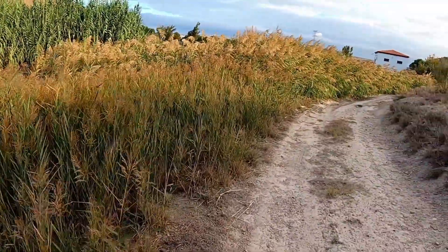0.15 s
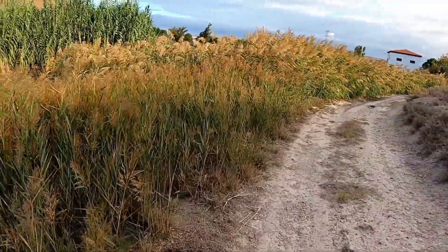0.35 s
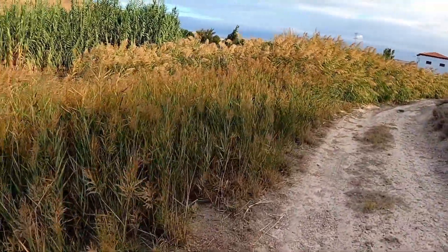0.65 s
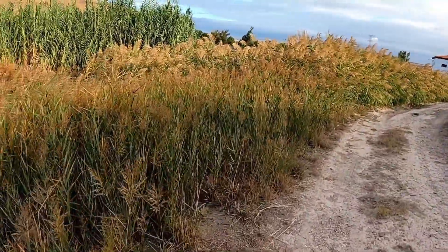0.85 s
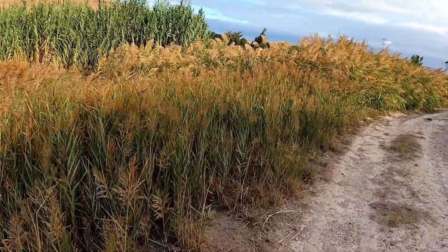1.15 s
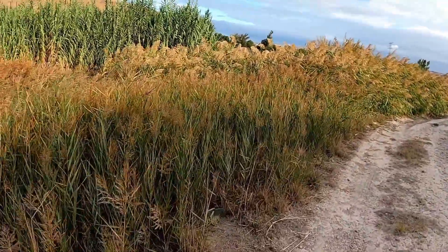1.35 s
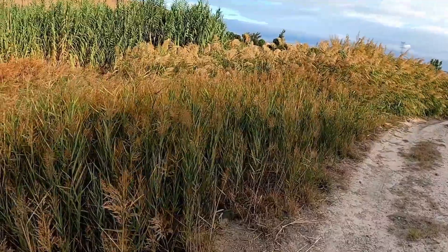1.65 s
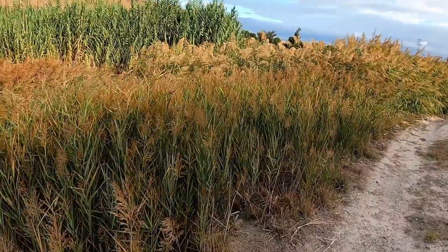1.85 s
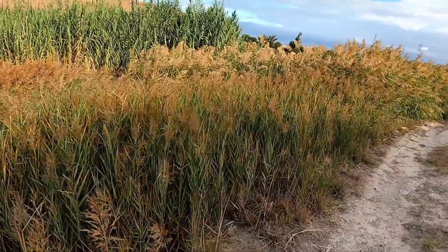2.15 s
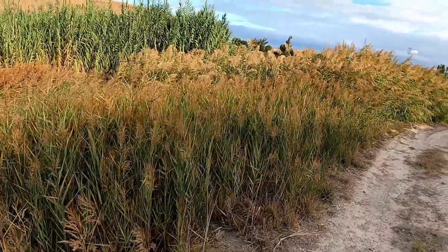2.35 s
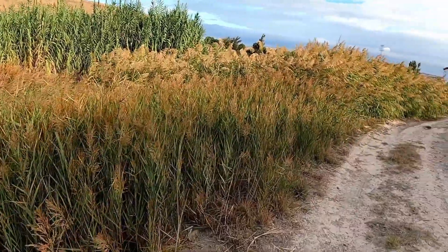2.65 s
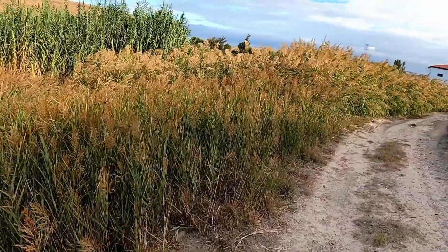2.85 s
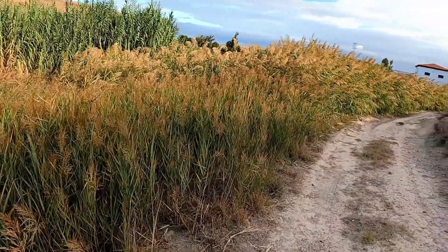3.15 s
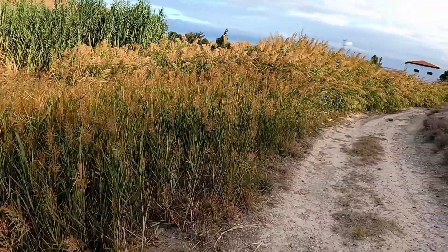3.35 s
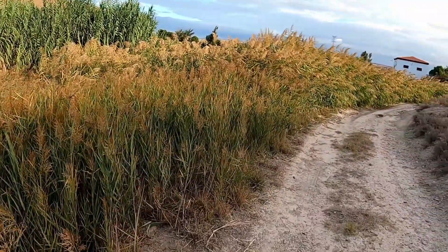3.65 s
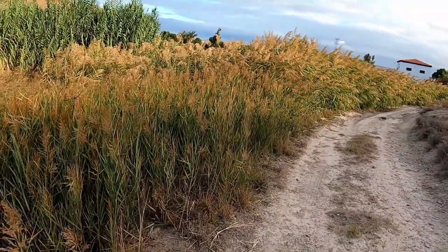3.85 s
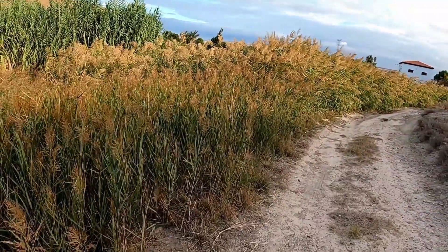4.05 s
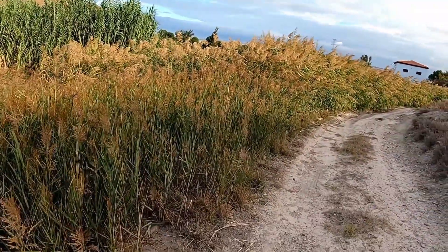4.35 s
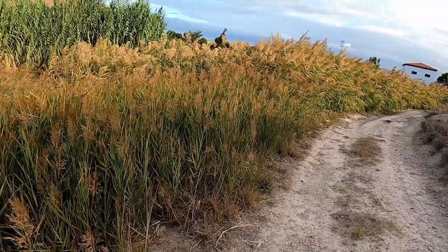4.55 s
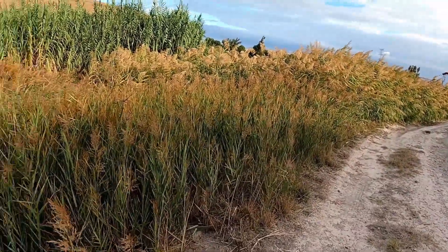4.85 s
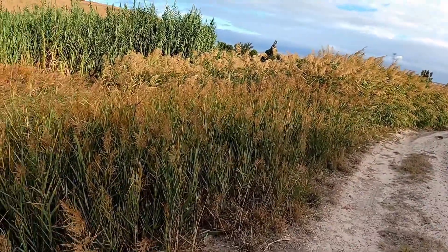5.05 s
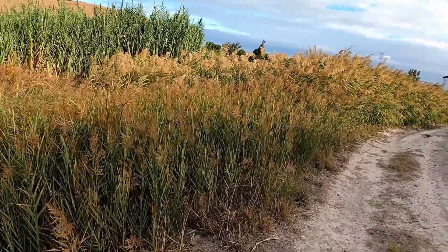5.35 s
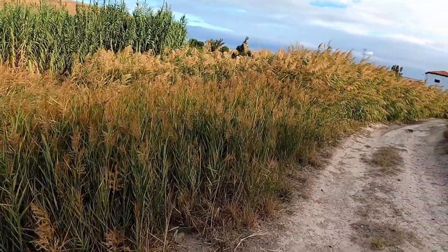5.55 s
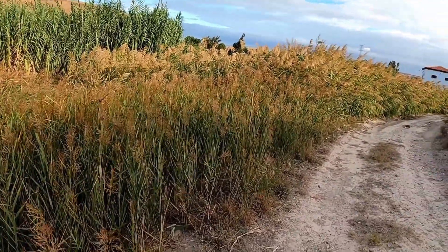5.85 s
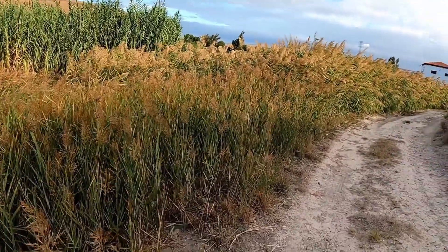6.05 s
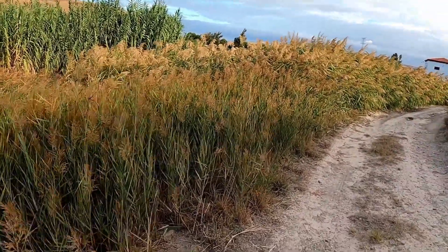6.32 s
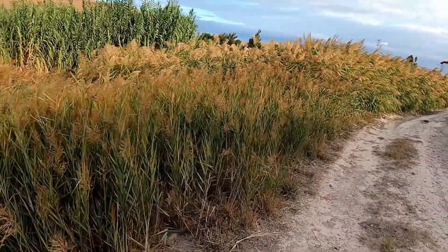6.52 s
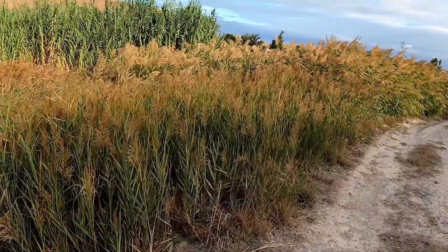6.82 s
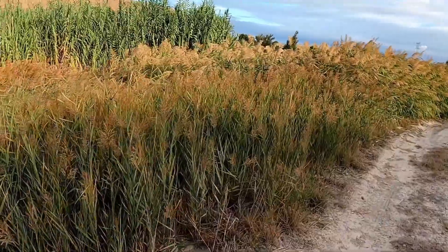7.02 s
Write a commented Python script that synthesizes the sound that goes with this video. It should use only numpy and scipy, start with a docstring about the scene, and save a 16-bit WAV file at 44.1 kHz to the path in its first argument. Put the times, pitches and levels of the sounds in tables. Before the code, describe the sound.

A quiet, airy hiss of reeds runs throughout the seven seconds beside an open farm track. At 0.2 s a puppy a little way off gives a tiny yip, jumping from a rough, chesty note to a thin whistle. A strong, deep wind buffet hits the microphone near 1.1 s, with a shorter one at 1.5 s. Two brief yips, one whistled and one lower, come at 1.9 and 2.0 s; dry stems tick at 2.3 and 2.8 s. From 3.4 s yips repeat quickly, at 3.7, 4.0, 4.4, 4.6 and 4.9 s, hoarse and cracking or thin and whiny, while low gusts thump between 3.0 and 4.0 s. The wind then eases. Another rough yip sounds at 5.4 s, then a cluster at 6.2 to 6.4 s and short squeaks at 6.6 and 6.9 s. Close, quick echoes follow each cry, and occasional faint stem ticks continue.

```python
"""Wind rumbles on the microphone ports and reeds hiss; then puppies yip a little way off along a track.
Most yips start in a chesty register and break upward into a thin whistle; some are whistle alone.
Voices are sums of partials on gliding pitches, roughened by half-rate lines and flutter.
Two clear echoes and a sparse noise scatter give each yip a short tail.
Gusts and reeds are banded noise on level curves; dry stems tick as short noise bursts."""
import sys
import numpy as np
from scipy import signal
from scipy.io import wavfile

SR = 44100
rng = np.random.default_rng(int(sys.argv[2]) if len(sys.argv) > 2 else 0)


def magnitude_from_level(level_db):
    """Linear magnitude for a level in decibels (20 dB per decade)."""
    exponent = np.asarray(level_db, float) / 20
    return 10 ** exponent


def pcm_store(signal):
    """Save signal as 16-bit PCM."""
    levels = np.round(np.clip(np.atleast_2d(signal), -1, 1) * 32767)
    wavfile.write(sys.argv[1], SR, levels.astype(np.int16).T)


N = 316638  # samples


def rms_one(x):
    """Scale to unit power."""
    return x / np.sqrt(np.mean(x ** 2) + 1e-20)


def in_time(rows):
    """Interpolate (t/s, value) rows at every sample."""
    t_s, value = np.transpose(rows)
    return np.interp(np.arange(N) / SR, t_s, value)


def band(x, low_hz, high_hz):
    """Second-order Butterworth band-pass."""
    return signal.sosfilt(signal.butter(2, [low_hz, high_hz], "band", fs=SR, output="sos"), x)


def drift(rate_hz):
    """Slow random curve of unit rms: noise through two equal poles at rate_hz."""
    hop, settling = 40, 2000  # samples at SR, discarded slow samples
    r = np.exp(-2 * np.pi * rate_hz * hop / SR)
    noise = rng.standard_normal(N // hop + settling + 2)
    slow = signal.lfilter([1], [1, -2 * r, r * r], noise)[settling:]
    return np.interp(np.arange(N) / hop, np.arange(len(slow)), rms_one(slow))


def banded_noise(spectrum, alike, shared_db, own_db, rate_hz):
    """Half-octave bands of stereo noise that swell together and flicker alone."""
    hz, db = np.transpose(spectrum)
    edges = hz[0] * 2 ** np.arange(0, np.log2(hz[-1] / hz[0]) + .5, .5)
    likeness = alike / (1 + (edges / 11000) ** 8)  # port correlation, lost in the top octave
    white = rng.standard_normal((2, 2, N))
    together = drift(rate_hz)
    out = 0
    for k, (low, high) in enumerate(zip(edges, edges[1:])):
        mid, side = band(white[k % 2], low, high)
        level_db = np.interp(np.log(low * high) / 2, np.log(hz), db)
        gain = magnitude_from_level(level_db + shared_db * together + own_db * drift(2 * rate_hz))
        stereo = np.sqrt(1 + likeness[k]) * mid + np.sqrt(1 - likeness[k]) * side * [[1], [-1]]
        out = out + gain * stereo
    return out


# gust rms on the ports, mean of left and right: t/s, level/dB
GUST_LEVEL = [(0.0, -42), (0.68, -51.5), (1.08, -23), (1.42, -47.5), (1.5, -29.5), (1.58, -51.5),
              (1.84, -43), (2.74, -45), (2.92, -48.5), (2.98, -35.5), (3.06, -44), (3.5, -33), (3.66, -45),
              (3.72, -30.5), (3.88, -46), (4.0, -30), (4.06, -45.5), (5.3, -53.5), (6.25, -51), (6.6, -45),
              (7.1, -43.5)]
# rumble density, relative: f/Hz, level/dB
RUMBLE_SPECTRUM = [(20, 3.5), (45, 9), (85, -3.5), (150, -10.5), (230, -44), (400, -59)]


def wind():
    """Turbulence at the ports: low noise, nearly alike on both, riding the gust curve."""
    rumble = rms_one(banded_noise(RUMBLE_SPECTRUM, 0.89, shared_db=2.5, own_db=3.5, rate_hz=6.26))
    return rumble * magnitude_from_level(in_time(GUST_LEVEL) + [[-1.5], [1.5]])


# reed hiss rms in 4.2-12 kHz, mean of left and right: t/s, level/dB
REED_LEVEL = [(0, -52.5), (1.8, -50.5), (2.6, -52.5), (4.5, -54), (5.3, -53.5), (5.7, -56), (6.4, -53),
              (7.18, -57)]
# hiss density, relative: f/Hz, level/dB
REED_SPECTRUM = [(90, -8), (160, 12), (280, 6.5), (520, -2.5), (900, 6), (1600, 4), (2200, 2), (3300, 4.5),
                 (5500, 0.5), (8000, -5), (12000, -19.5), (15500, -27.5)]


def reeds():
    """Many rubbing leaves sum to broad noise with a small flicker."""
    hiss = banded_noise(REED_SPECTRUM, 0.85, shared_db=0.9, own_db=0.6, rate_hz=6.0)
    hiss /= np.std(band(hiss, 4200, 12000))
    return hiss * magnitude_from_level(in_time(REED_LEVEL) + [[.3], [-.3]])


# dry stem ticks: t/s, peak level/dB, reference f/Hz (band f/3 to 2f), decay to 1/e before the band-pass/s
STEM_TICKS = [(2.2915, -29, 2030, .004), (2.7687, -29, 1630, .004), (3.27, -37, 1500, .005),
              (5.2734, -39, 4000, .008), (5.749, -34, 1300, .004), (6.0275, -31, 2800, .004),
              (6.4874, -36, 2800, .012), (6.598, -33, 2200, .004)]


def stems():
    """A snapping stem: noise decaying in milliseconds, band-passed around its reference frequency."""
    out = np.zeros(N)
    t = np.arange(SR // 10) / SR
    for t_s, peak_db, hz, decay_s in STEM_TICKS:
        noise = rng.standard_normal(len(t))
        burst = band(noise * np.exp(-t / decay_s), hz / 3, hz * 2)
        at = round(t_s * SR)
        out[at:at + len(t)] += magnitude_from_level(peak_db) * burst / np.abs(burst).max()
    return out


# returns from two walls, before the 1170-7200 Hz band-pass: delay/s, level/dB
WALL_ECHOES = [(.025, -3), (.034, -4)]


def surroundings(outgoing):
    """Two clear echoes and a thin decaying scatter from many stems, partly different at each port."""
    scatter_db, scatter_t60_s, hits_per_s = -1, .36, 1200
    t = np.arange(SR // 2) / SR
    sparse = rng.standard_normal((3, len(t))) * (rng.random((3, len(t))) < hits_per_s / SR)
    shared, own = sparse[0], sparse[1:]
    scatter = (shared + 4.1 * own) * magnitude_from_level(-60 * t / scatter_t60_s) * (t > .006)
    response = magnitude_from_level(scatter_db) * scatter / np.sqrt(np.sum(scatter ** 2, axis=1)[:, None])
    for delay_s, db in WALL_ECHOES:
        response[:, round(delay_s * SR)] += magnitude_from_level(db)
    return signal.fftconvolve(band(outgoing, 1170, 7200), response, axes=1)[:, :N]


def chest_note(t_s, length_s, first_hz, last_hz, middle, peak_db, fade_db, octave_first_db, octave_last_db):
    """Pitch climbs in an S, the fundamental bends at 0.42 of the length, the octave drifts alone."""
    u = np.linspace(0, 1, num=12)
    level = peak_db + np.interp(u, [0, 0.42, 1], [-0.5, 0, -fade_db])
    v = u ** (np.log(.5) / np.log(middle))  # puts mid-climb at `middle`
    pitch = first_hz + (last_hz - first_hz) * v * v * (3 - 2 * v)
    octave = octave_first_db + (octave_last_db - octave_first_db) * u
    return np.c_[t_s + length_s * u, pitch, level, octave]


def whistle(t_s, length_s, first_hz, held_hz, flick_hz, first_db, last_db, octave_db):
    """Pitch eases into a held note, swelling mid-way, then flicks away while the voice dies."""
    settle_power, arch_db = 1.7, 1
    flick_s = 0.0031 if flick_hz > held_hz else 0.0165  # an upward flick is cut short
    flick_bend, flick_loss_db, flick_octave_loss_db = 1.3, 13, 15
    u = np.linspace(0, 1, num=12)
    level = first_db + (last_db - first_db) * u + arch_db * np.sin(np.pi * u)
    pitch = held_hz + (first_hz - held_hz) * (1 - u) ** settle_power
    held = np.c_[t_s + length_s * u, pitch, level, octave_db + level - level.max()]
    u = u[1:]
    flick_pitch = held_hz + (flick_hz - held_hz) * u ** flick_bend
    flick = np.c_[t_s + length_s + flick_s * u, flick_pitch,
                  last_db - flick_loss_db * u ** 2, held[-1, -1] - flick_octave_loss_db * u]
    return np.r_[held, flick]


def yip(rows, hoarse, third_db, flutter):
    """Vocal folds as six partials; hoarse notes jitter, alternate cycles and split into two pitches."""
    chest_top_hz, throat_cut_hz = 1500, 6300
    chest_scoop_s, whistle_scoop_s, lagging_fold_db = 0.0075, 0.0039, -1
    s, pitch, first_db, second_db = np.transpose(rows)
    first_hz = pitch[0]
    scoop_s = chest_scoop_s if first_hz < chest_top_hz else whistle_scoop_s
    s = np.r_[s[0] - scoop_s, s]  # scoops up into the first pitch
    t = np.arange(s[0], s[-1], 1 / SR)
    flutter = flutter[:, :len(t)]
    pitch = np.interp(t, s, np.r_[.9 * first_hz, pitch])
    first = np.interp(t, s, np.r_[0, magnitude_from_level(first_db)])
    second = np.interp(t, s, np.r_[0, magnitude_from_level(second_db)])
    second *= np.exp(-(np.gradient(pitch) * SR / 60000) ** 2)  # overtones drop out on fast glides
    second *= 1 + .4 * flutter[2]
    chest = 1 / (1 + (pitch / chest_top_hz) ** 12)
    onset = np.clip((t - s[0]) / .05, .15, 1)
    strain = hoarse * (.05 + .5 * hoarse ** 3 * (1 - chest) + chest * onset)

    steady = 2 * np.pi * np.cumsum(pitch) / SR
    phase = steady + (.03 + .2 * strain) * flutter[0]
    voice = first * np.sin(phase) + second * np.sin(2 * phase)
    # higher partials follow the octave, dulled by the throat
    for k, under_db in enumerate(third_db - np.array([0, 9, 13, 15]), start=3):
        patchy = 1 + .7 * flutter[k]  # each comes and goes alone
        throat = 1 / (1 + (k * pitch / throat_cut_hz) ** 6)
        chest_dulling = 1 - .65 * chest * (k * pitch > 3350)
        voice += second * patchy * magnitude_from_level(under_db) * np.sin(k * phase) * throat * chest_dulling

    # strong-weak cycles add broken half lines
    halves = .5 * first * (np.sin(1.5 * phase) * chest + np.sin(phase / 2) * (1 - chest))
    halves += second * np.sin(2.5 * phase)
    voice = voice * (1 + .3 * strain * flutter[1]) + .45 * strain * halves * (.8 + .35 * flutter[0])

    # one fold stays near the first pitch while the other climbs; heard once they part
    lag = 2 * np.pi * np.cumsum(np.minimum(pitch, 1.06 * first_hz)) / SR + phase - steady
    apart = chest * np.clip((pitch / first_hz - 1.1) * 10, 0, 1)
    split = first * np.sin(lag) + second * (np.sin(phase + lag) + np.sin(2 * phase - lag))
    voice += magnitude_from_level(lagging_fold_db) * hoarse * apart * split
    return s[0], np.sqrt(2) * voice * np.minimum(1, (s[-1] - t) / 0.004)


# chest notes: t/s, length/s, first f/Hz, last f/Hz, mid-climb/share of length, fundamental level/dB,
# drop to the end/dB, octave level at start/dB, octave level at end/dB
CHEST_NOTES = [(0.226, 0.043, 949, 1065, 0.51, -22, -1.5, -31.5, -22),
               (2.024, 0.032, 1101, 1246, 0.36, -23, -0.5, -37, -34),
               (3.388, 0.042, 952, 1240, 0.61, -19.5, 3, -37.5, -28.5),
               (3.704, 0.047, 1005, 1313, 0.55, -28.5, -4.5, -24.5, -38),
               (4.037, 0.05, 945, 1330, 0.55, -17.5, 5, -34, -31.5),
               (4.364, 0.02, 854, 1157, 0.68, -33.5, -18.5, -29, -22.5),
               (4.379, 0.018, 1276, 1415, 0.57, -21, -1, -35, -40),
               (4.567, 0.032, 734, 907, .6, -35.5, 2, -56, -42),
               (4.899, 0.0373, 804, 917, 0.39, -37, 7.5, -52, -39),
               (5.391, 0.034, 897, 1045, 0.58, -29.5, 13, -33.5, -29),
               (6.208, 0.041, 878, 1023, 0.29, -21.5, 8, -44, -31.5)]
# whistles: t/s, held length/s, first f/Hz, held f/Hz, f after the flick/Hz, first level/dB before the arch,
# last level/dB, octave peak level/dB
WHISTLE_NOTES = [(0.272, 0.042, 1828, 1984, 1340, -18.5, -18.5, -40),
                 (1.899, 0.033, 1835, 1931, 2034, -24.5, -15.5, -34.5),
                 (3.431, 0.037, 1790, 2024, 1580, -21, -21.5, -40),
                 (3.751, 0.036, 1890, 1960, 1580, -15, -20.5, -47.5),
                 (4.089, 0.034, 1850, 1970, 1460, -20, -19, -52.5),
                 (4.397, 0.068, 1772, 1903, 895, -19.5, -24, -45),
                 (4.602, 0.074, 1308, 1750, 1730, -45, -39.5, -61),
                 (4.689, 0.057, 1780, 1852, 2180, -29, -17, -35.5),
                 (4.934, 0.063, 1617, 1980, 2000, -43, -26.5, -49),
                 (5.428, 0.042, 1737, 1815, 1590, -32, -19, -32),
                 (6.249, 0.04, 1844, 1808, 1804, -36.5, -28.5, -40.5),
                 (6.312, 0.068, 1250, 1948, 2100, -36.5, -22.5, -42.5),
                 (6.584, 0.042, 1294, 1732, 1730, -47.5, -17.5, -30.5),
                 (6.644, 0.0025, 1930, 2136, 2090, -16.5, -28, -53),
                 (6.859, 0.035, 1688, 1785, 1800, -27, -19.5, -32.5),
                 (6.899, 0.0244, 1890, 2135, 2030, -22.5, -33.5, -58)]
# one row a yip, for all notes after t: t/s, hoarseness/0-1, left minus right level/dB
YIP_MANNER = [(0.2, .4, 0), (1.85, 0, -1.1), (2.0, .04, 0), (3.35, .45, -.6), (3.68, .8, -2.1),
              (4.0, .65, 0), (4.35, .5, -1.5), (4.55, .08, 1.5), (4.88, .08, -3.5), (5.37, .75, -3),
              (6.18, .75, .6), (6.245, 1, .6), (6.3, .15, 1.5), (6.55, .1, 2.5), (6.84, .1, -.6)]
# same rows: sound sent to the surroundings, level/dB; third partial against the octave, level/dB
YIP_PLACE = [(-11.5, -10.5), (-13.5, -18), (-18.5, -12), (-16.5, -8), (-17.5, -21), (-16.5, -9), (-12, -14),
             (-15, -26), (-12.5, -10), (-7, -18), (-7.5, -2.5), (-11, -12), (-13, -15), (-11.5, -23),
             (-10.5, -26)]


def puppies():
    """Small throats, radiating little bass: every note panned; returns (direct, sent to surroundings)."""
    out = np.zeros((2, 2, N))
    notes = [chest_note(*row) for row in CHEST_NOTES] + [whistle(*row) for row in WHISTLE_NOTES]
    flutter = rms_one(band(rng.standard_normal((len(notes), 7, SR // 4)), 25, 220))
    yip_starts = np.array(YIP_MANNER)[:, 0]
    for rows, shake in zip(notes, flutter):
        row = np.searchsorted(yip_starts, rows[0, 0]) - 1
        _, hoarse, pan_db = YIP_MANNER[row]
        return_db, third_db = YIP_PLACE[row]
        start_s, voice = yip(rows, hoarse, third_db, shake)
        for side, sign in enumerate((1, -1)):
            at = round(start_s * SR) + 1 - side  # right port one sample early
            out[:, side, at:at + len(voice)] += voice * magnitude_from_level([[0], [return_db]]) * magnitude_from_level(sign * pan_db / 2)
    return signal.sosfilt(signal.butter(4, 650, "high", fs=SR, output="sos"), out)


def scene():
    """Wind, reeds, stems, and the puppies with their echoes."""
    dogs, outgoing = puppies()
    return wind() + reeds() + stems() + surroundings(outgoing) + dogs


def band_limit(x):
    """A steep low-pass at the top of the band."""
    return signal.sosfilt(signal.butter(12, 15700, fs=SR, output="sos"), x)


def record(dry):
    """Steep low-pass: 60 dB down from 15.9 kHz."""
    cut = signal.sosfilt(signal.cheby2(10, 60, 15900, fs=SR, output="sos"), dry)
    return band_limit(cut)


dry = scene()
out = record(dry)
pcm_store(out)
```